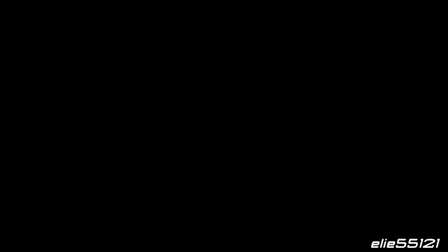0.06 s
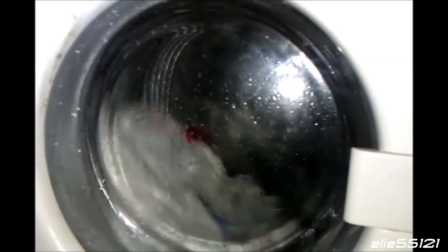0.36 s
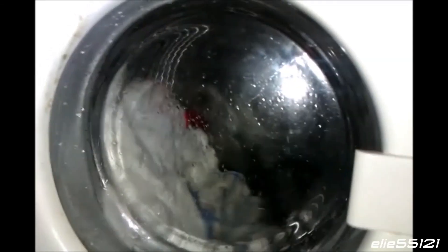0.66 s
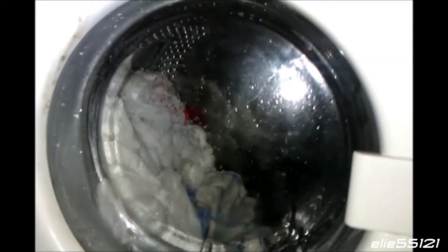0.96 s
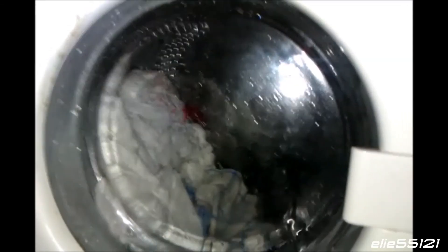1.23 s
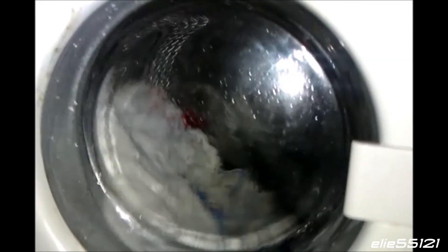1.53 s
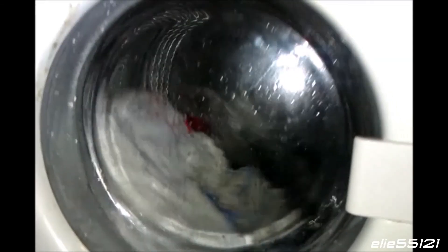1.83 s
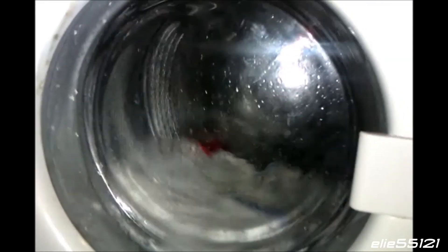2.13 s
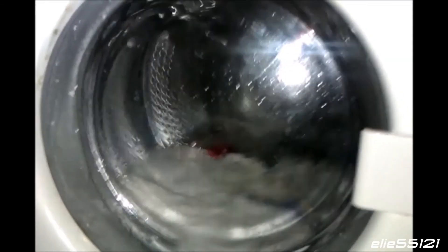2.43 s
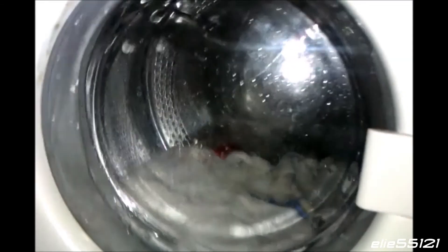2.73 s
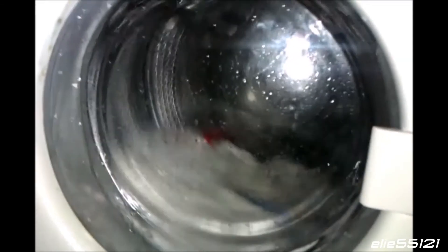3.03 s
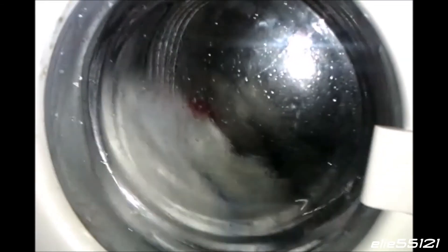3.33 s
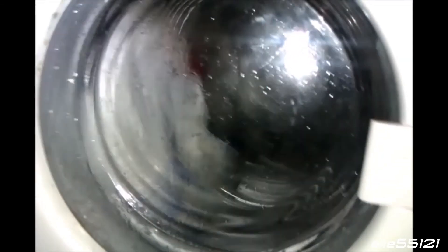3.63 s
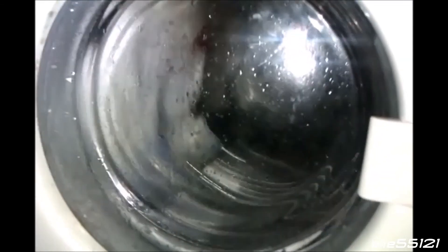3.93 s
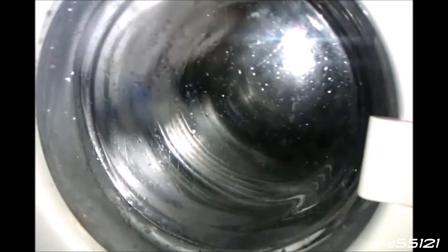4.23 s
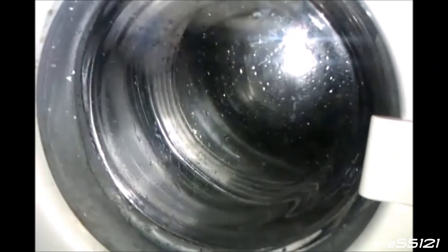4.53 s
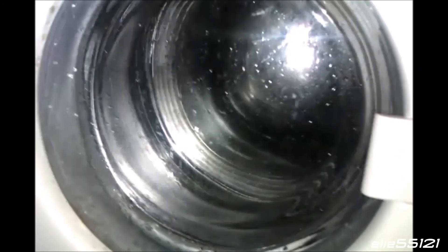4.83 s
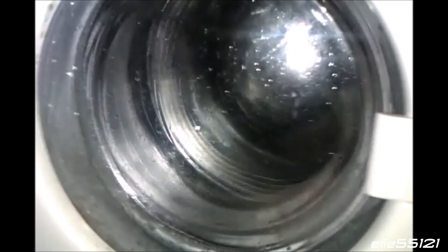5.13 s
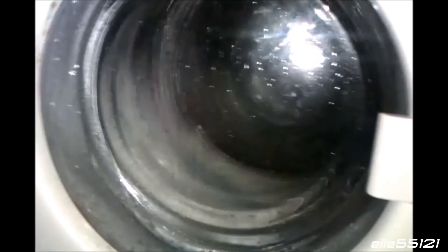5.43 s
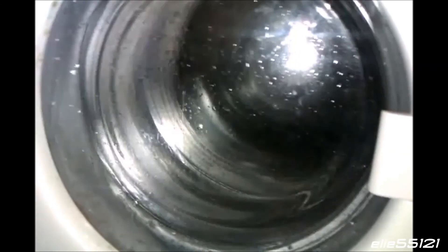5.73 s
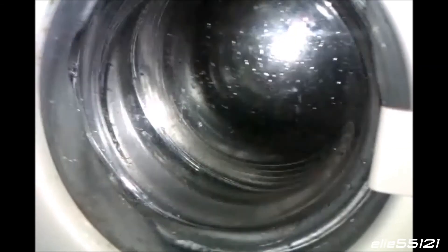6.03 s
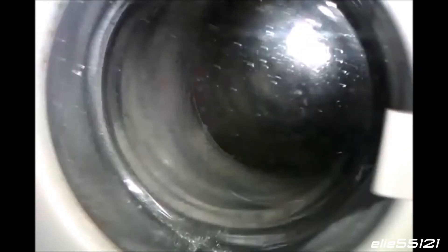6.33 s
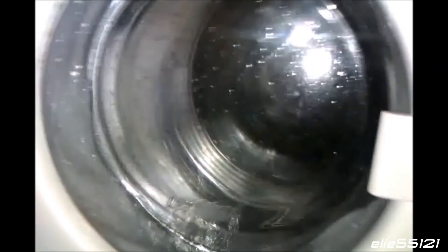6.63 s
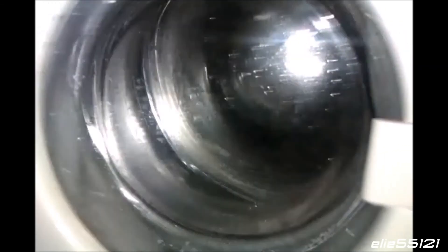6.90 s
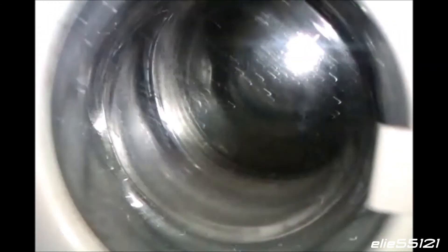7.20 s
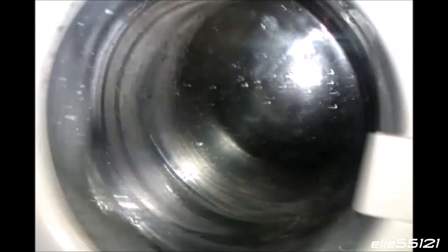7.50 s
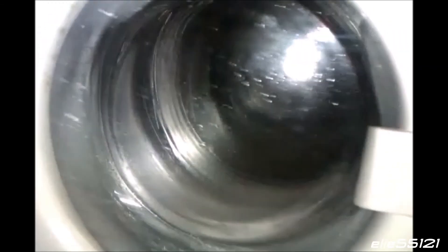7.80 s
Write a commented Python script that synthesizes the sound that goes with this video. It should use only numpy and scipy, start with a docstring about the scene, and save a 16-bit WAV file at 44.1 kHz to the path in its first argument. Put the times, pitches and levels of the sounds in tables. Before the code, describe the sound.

Close to a washing machine in a small room, the motor and drum drone quietly while wet cloth flops and buttons tap the door. Dull thumps begin and a deep shaking grows as the lopsided load spins up. Water sloshes briefly, then the tub slams irregularly into the sheet-metal cabinet, with booming blows, sharp knocks and a buzzing rattle, far louder than the opening hum.

```python
"""A front-loading washing machine, heard close to its door, turns a wet load and then speeds up.
Laundry flops and water sloshes over the hum of motor and drum. The load clings to one side, so the
tub swings on its springs, thumps and finally bangs against the rattling sheet-steel cabinet."""
import sys
import numpy as np
from scipy import signal
from scipy.fft import rfft, irfft, next_fast_len
from scipy.io import wavfile
from scipy.ndimage import map_coordinates

SR = 44100
rng = np.random.default_rng(int(sys.argv[2]) if len(sys.argv) > 2 else 0)


def master_out(mix):
    """Clip the mix to full scale and print it as 16-bit PCM to the path in sys.argv[1]."""
    frames = np.transpose(np.atleast_2d(mix))
    ceiling = np.clip(frames, -1, 1)
    pcm = np.round(ceiling * 32767).astype(np.int16)
    wavfile.write(sys.argv[1], SR, pcm)


N = 351036

# drum and housing resonances: freq_hz, width_hz, height_db (times depth)
DRUM_PEAKS = [(284.3, 53, 3.5), (372, 43, 4.5), (408, 47, 2), (487, 31, 4), (545, 60, 5.5), (627, 39, 5),
              (765, 39, 4.5), (1209, 130, 3), (1622, 35, 3.5), (1820, 150, 4.5), (2026, 30, 4.5)]
# cabinet resonances: freq_hz, width_hz, height_db (times depth)
CABINET_PEAKS = [(174, 14, -0.5), (268, 28, 7), (376, 46, 11), (540, 44, 2.5), (603, 20, 3.5),
                 (652.8, 19, 9.5), (813, 43, 9), (1205, 49, 4), (1350, 160, 5), (1750, 280, 7.5),
                 (1860, 270, 4), (2064, 30, 13.5), (2410, 45, 8)]
# heavy blows on the cabinet: start_s, level_db, rise_s, t60_s, bass_db, treble_db
HEAVY_BLOWS = [(6.081, -24.5, 0.004, 0.33, 8, -2), (6.1, -25, 0.004, 0.14, 5.5, 5.5),
               (7.027, -10.5, 0.019, 0.46, 4.5, 1), (7.056, -10, 0.022, 0.23, -2.5, 12),
               (7.26, -14, 0.0011, 0.25, -5.5, -2.5), (7.764, -13.5, 0.0033, 0.23, 3.5, -1),
               (7.821, -12.5, 0.018, 0.19, 2, -22)]


def amp(db):
    """Decibels to gain."""
    return 10 ** (np.asarray(db) / 20)


def unit(x):
    """Scale to rms 1."""
    return x / np.sqrt(np.mean(x ** 2) + 1e-20)


def along(points, hz):
    """Interpolate (freq_hz, value) rows on a log axis."""
    freq_hz, values = np.transpose(points)
    return np.interp(np.log(hz + 1), np.log(freq_hz + 1), values)


def wobble(rate_hz, size=N):
    """Smooth random curve, rate_hz knots a second."""
    knots = rng.standard_normal(size // 20 + 4)
    return map_coordinates(knots, [np.arange(size) * rate_hz / SR], mode="wrap")


def noise(colour_db, size=N):
    """Noise of rms 1 shaped by colour_db(hz)."""
    n_fft = next_fast_len(size)
    gain = amp(colour_db(np.fft.rfftfreq(n_fft, 1 / SR)))
    return unit(irfft(rfft(rng.standard_normal(n_fft)) * gain, n_fft)[:size])


def body(spectrum, peaks=(), depth=1):
    """Broad spectrum plus resonant peaks, as dB against Hz."""
    return lambda hz: along(spectrum, hz) + depth * sum(
        db / (1 + (2 * (hz - peak_hz) / width_hz) ** 2) for peak_hz, width_hz, db in peaks)


def resonances(modes):
    """Wavering tones: one narrow noise band per mode."""
    return sum(amp(db) * noise(lambda hz: -20 * np.log10(1 + ((hz - mode_hz) / width_hz) ** 2))
               for mode_hz, width_hz, db in modes)


def swell(rise_s, t60_s):
    """1 s envelope: rise to 1, exponential decay."""
    t = np.arange(SR) / SR
    attack = np.sin(np.pi / 2 * np.minimum(t / rise_s, 1))
    return attack * amp(-60 * np.maximum(t - rise_s, 0) / t60_s)


def add(track, start_s, sound):
    """Mix a sound into the track."""
    part = track[max(round(start_s * SR), 0):][:len(sound)]
    part += sound[:len(part)]


def bursts(rows, colour_db, chatter_hz, chatter_db):
    """Rushes of small uneven contacts excite a body's dense modes."""
    out = np.zeros(N)
    for start_s, db, rise_s, t60_s in rows:
        contacts = unit(amp(chatter_db * wobble(chatter_hz, size=SR)))
        add(out, start_s, amp(db) * swell(rise_s, t60_s) * contacts * noise(colour_db, size=SR))
    return out


def room(x):
    """Small hard-walled room; each frequency decays at its own rate."""
    decay = [(100, 0.086), (500, 0.83), (2000, 0.96), (5000, 0.069)]  # reverberation: freq_hz, t60_s
    hz, t, spectra = signal.stft(rng.standard_normal(SR // 2), SR, nperseg=256)
    tail = signal.istft(spectra * amp(-60 * t / along(decay, hz)[:, None]), SR, nperseg=256)[1]
    delayed = np.pad(x, (SR // 100, 0))
    return signal.fftconvolve(delayed, tail / np.linalg.norm(tail))[:N]


def running(whirr_db=-40.5, hiss_db=-68.5):
    """Motor, belt and drum whirr through the housing; the tub drones, the wet drum hisses."""
    # spectra: freq_hz, level_db
    whirr_colour = [(15, -7.5), (50, -16), (140, -8.5), (220, -3.5), (320, -6), (400, -3.5), (600, -5),
                    (750, -10.5), (1000, -11), (1850, -10), (2300, -17), (3200, -27.5), (4700, -68.5),
                    (5000, -68)]
    hiss_colour = [(2600, -25), (3500, 0), (4700, -1), (4850, -50), (6000, -90)]
    drone_modes = [(29.5, 3, -55), (71.7, 14, -42), (79.7, 8.5, -51), (105.5, 16, -47.5),
                   (422.6, 1.6, -51.5)]  # tub on its mounts: freq_hz, width_hz, level_db
    flutter = amp(0.63 * wobble(7) + 0.37 * wobble(70))
    whirr = amp(whirr_db) * flutter * noise(body(whirr_colour, DRUM_PEAKS, depth=1.14))
    return whirr + resonances(drone_modes) + amp(hiss_db) * noise(body(hiss_colour))


def wet_load():
    """Cloth flops in the drum and scrapes the door, water is flung, drops and buttons hit the glass."""
    # events: start_s, level_db, rise_s, t60_s
    flops = [(1.945, -37.5, 0.027, 0.23), (2.333, -28.5, 0.0071, 0.34), (4.54, -34, 0.015, 0.44),
             (4.965, -30.5, 0.01, 0.85), (5.04, -34.5, 0.016, 0.44), (5.23, -43, 0.014, 0.72),
             (5.8, -33, 0.058, 1), (6.085, -20, 0.031, 0.073)]
    scrapes = [(1.27, -51.5, .05, 0.62), (2.311, -29.5, 0.0054, 0.26)]
    splashes = [(6.35, -29, 0.088, 0.78), (6.5, -25, 0.073, 0.25)]
    ticks = [(.667, -51, 0.00085, 0.043), (2.312, -41, .001, 0.047), (5.943, -44.5, 0.0009, 0.075),
             (6.09, -34, 0.0024, 0.088), (6.412, -29.5, 0.0021, 0.06), (7.412, -38, .003, 0.096),
             (7.613, -48, 0.0021, 0.044)]
    clacks = [(.667, -35.5, 0.0025, 0.034), (2.274, -33, .001, 0.03), (2.340, -29.5, .002, 0.073),
              (5.371, -36, 0.002, 0.079), (6.096, -28, .002, .04), (6.107, -21.5, .002, 0.049),
              (6.268, -28, 0.0024, 0.097), (7.262, -18, 0.0012, 0.078), (7.612, -30, 0.0053, 0.071)]
    # their spectra: freq_hz, level_db
    flop_colour = [(60, 2.5), (130, 2), (210, 9), (290, 5.5), (370, 6.5), (540, -3), (700, -1),
                   (1000, -12.5), (2000, -41), (4000, -75), (5500, -96)]
    scrape_colour = [(300, -5), (600, 7), (1150, -8.5), (1700, 5.5), (2200, -3.5), (2800, -17), (3400, -13),
                     (3900, -32), (4600, -66)]
    splash_colour = [(250, 3), (600, 3), (1200, -2), (1900, 3.5), (2600, -4), (3600, -17.5), (4300, -17.5),
                     (5000, -18.5), (5400, -56.5)]
    tick_colour = [(1200, -26.5), (2200, 26), (2900, 11.5), (3800, -11.5), (4900, -36.5), (5300, -49.5)]
    clack_colour = [(300, -24), (700, 7.5), (1100, 12), (2100, 17), (2800, -14), (3700, -12), (4600, -50)]
    cloth = bursts(flops, body(flop_colour), chatter_hz=85, chatter_db=0)
    folds = bursts(scrapes, body(scrape_colour), chatter_hz=260, chatter_db=-3)
    water = bursts(splashes, body(splash_colour, DRUM_PEAKS, depth=0.73), chatter_hz=225, chatter_db=2.5)
    drops = bursts(ticks, body(tick_colour), chatter_hz=460, chatter_db=0.5)
    buttons = bursts(clacks, body(clack_colour), chatter_hz=590, chatter_db=3.5)
    return cloth + folds + water + drops + buttons


def swing_db(time_s):
    """The tub swings wider as the drum speeds up."""
    rocking = [(4.2, -57), (5.1, -13), (5.78, -18.5), (5.92, -13), (6.5, -2), (7.96, -0.5)]  # swing: time_s, level_db re full swing
    return np.interp(time_s, *np.transpose(rocking))


def aftershake(gain_db=-11.5):
    """Shaking amplitude: each heavy blow feeds in energy that slowly decays."""
    energy = np.zeros(N)
    for start_s, db, *_ in HEAVY_BLOWS:
        add(energy, start_s, (amp(db + gain_db) * swell(rise_s=0.0095, t60_s=2.88)) ** 2)
    return np.sqrt(energy)


def unbalance(boom_db=-31.5, shudder_db=-31.5, rattle_db=-13, sway_db=-26.5):
    """The lopsided load rocks it all: tub booms, panels shudder and sing, parts buzz, frame sways."""
    # spectra: freq_hz, level_db
    boom_colour = [(35, -23), (65, 0.5), (85, -2), (118, 0.5), (160, -26.5), (300, -84.5)]
    shudder_colour = [(70, -35.5), (160, 3), (270, 2.5), (380, 0.5), (600, -4), (1000, -13.5),
                      (1900, -16.5), (2600, -25), (3800, -73)]
    rattle_colour = [(600, -23), (1200, 13), (2000, 7.5), (2450, -0.5), (2850, 3), (3400, -22.5),
                     (4200, -59)]
    sway_colour = [(6, -17), (18, 44), (40, 33.5), (55, 5), (90, -71)]
    singing_modes = [(173, 4.6, -11.5), (356, 7.1, -7.5), (542, 3.4, -15), (773, 17, -24), (1710, 23, -19)]  # sheet steel: freq_hz, width_hz, level_db re shake
    rock_db, shake = swing_db(np.arange(N) / SR), aftershake()
    boom = np.hypot(amp(boom_db + 0.51 * rock_db), amp(-3) * shake) * noise(body(boom_colour))
    shudder_gain = np.hypot(amp(shudder_db + rock_db), amp(-2) * shake) * amp(1.6 * wobble(45))
    shudder = shudder_gain * noise(body(shudder_colour, CABINET_PEAKS, depth=0.42))
    rattle = amp(rattle_db + 2.3 * wobble(98)) * noise(body(rattle_colour))
    sway = amp(sway_db + 2.2 * rock_db) * noise(body(sway_colour))
    return boom + shudder + shake * (resonances(singing_modes) + rattle) + sway


def thumps(rise_s=0.018):
    """Each shove of the tub rings the cabinet's lowest mode."""
    shoves = [(4.586, -23, 106, 0.28), (5.018, -26, 88, 0.28), (6.085, -8.5, 80.6, 0.4),
              (6.132, -12, 84, 0.13), (6.255, -21, 84, 0.18), (7.052, -5.5, 97.7, 0.099),
              (7.058, -12, 78.7, 0.39), (7.765, -11, 90.2, 0.54), (7.838, -15.5, 102.7, 0.19)]  # start_s, peak_db, pitch_hz, t60_s
    out, t = np.zeros(N), np.arange(SR) / SR
    for start_s, db, hz, t60_s in shoves:
        add(out, start_s, amp(db) * swell(rise_s, t60_s) * np.sin(2 * np.pi * hz * t))
    return out


def knocks(rise_s=0.0016, light_t60_s=0.051, drag_s=0.057):
    """A short crack, and the plastic tub rings; a wider swing drags the contact out."""
    strikes = [(.237, -27.5), (1.973, -29), (1.992, -28.5), (2.335, -24), (2.359, -33), (2.376, -29),
               (5.372, -33.5), (6.084, -18), (6.267, -17.5), (6.397, -20), (6.921, -25.5), (7.028, -13),
               (7.262, -10), (7.405, -15.5), (7.422, -17), (7.821, -10), (7.947, -13)]  # start_s, level_db
    crack_colour = [(150, -11), (450, 11), (650, -1), (850, 4.5), (1150, -3), (2000, -7.5), (2800, -21),
                    (4000, -33), (5000, -62)]  # spectrum: freq_hz, level_db
    tub_modes = [(600, -8.5), (690, -6), (815, -9), (890, -11.5)]  # freq_hz, level_db
    rows = [(start_s, db, light_t60_s + drag_s * amp(swing_db(start_s))) for start_s, db in strikes]
    cracks = [(start_s, db - 4.5, rise_s, t60_s) for start_s, db, t60_s in rows]
    out = bursts(cracks, body(crack_colour, CABINET_PEAKS, depth=0.96), chatter_hz=250, chatter_db=-5.5)
    t = np.arange(SR) / SR
    for start_s, db, t60_s in rows:
        ring = np.zeros(SR)
        for mode_hz, mode_db in tub_modes:
            gain = amp(mode_db + rng.normal(0, 1))
            pitch_hz = mode_hz * rng.normal(1, 0.032)
            ring += gain * np.sin(2 * np.pi * (pitch_hz * t + rng.random()))
        add(out, start_s, amp(db) * swell(rise_s, t60_s) * ring)
    return out


def clanks():
    """Steel meets steel and rings the thin sheet's high modes."""
    contacts = [(6.085, -44, .005, 0.11), (6.267, -45.5, 0.0024, 0.077), (7.066, -35, .008, 0.35),
                (7.262, -44.5, .003, 0.27), (7.763, -41.5, 0.0023, 0.084), (7.824, -50, 0.006, 0.097)]  # start_s, level_db, rise_s, t60_s
    sheet_modes = [(2865, 100, -3), (3290, 110, -1.5), (3700, 110, -4), (4144, 100, -13),
                   (4770, 100, -12.5), (5800, 120, -38)]  # freq_hz, width_hz, level_db
    strength = np.zeros(N)
    for start_s, db, rise_s, t60_s in contacts:
        add(strength, start_s, amp(db) * swell(rise_s, t60_s))
    return strength * resonances(sheet_modes)


def crash(blow, bass_hz=500, treble_hz=2900):
    """The tub bangs the sheet steel; each blow has its own amount of bass and treble."""
    steel_colour = [(50, -40), (130, 15), (350, 4.5), (700, 5), (1100, -1.5), (2000, -8), (2700, -15),
                    (4000, -29), (5200, -50.5), (6500, -50.5)]  # spectrum: freq_hz, level_db
    *event, bass_db, treble_db = blow
    steel = body(steel_colour, CABINET_PEAKS, depth=0.93)

    def colour_db(hz):
        low_shelf_db = bass_db / (1 + (hz / bass_hz) ** 2)
        high_shelf_db = treble_db * np.clip(np.log2((hz + 1) / treble_hz), 0, 1)
        return steel(hz) + low_shelf_db + high_shelf_db
    return bursts([event], colour_db, chatter_hz=460, chatter_db=-0.3)


def scene():
    """The machine in mono; impacts and load also excite the room."""
    hits = sum(crash(blow) for blow in HEAVY_BLOWS) + knocks() + clanks() + wet_load()
    return (running() + unbalance() + thumps() + hits + amp(-13) * room(hits))[None]


def record(dry, start_s=0.158, fade_s=0.002, cutoff_hz=5814):
    """Clip at full scale, mute until start_s, fade out, low-pass steeply."""
    gate = np.arange(N) / SR >= start_s
    fade = np.minimum(np.arange(N)[::-1] / (fade_s * SR), 1)
    n_fft = next_fast_len(N + SR // 2)
    lowpass = 1 / (1 + (np.fft.rfftfreq(n_fft, 1 / SR) / cutoff_hz) ** 60)
    return irfft(rfft(np.clip(dry, -1, 1) * gate * fade, n_fft) * lowpass, n_fft)[..., :N]


dry = scene()
out = record(dry)
master_out(out)
```